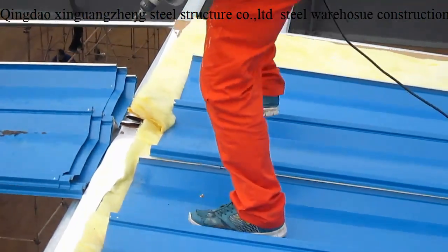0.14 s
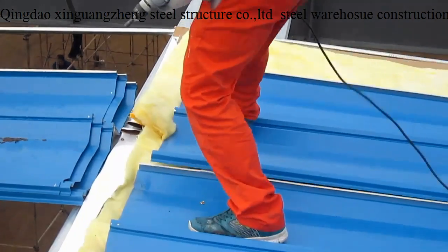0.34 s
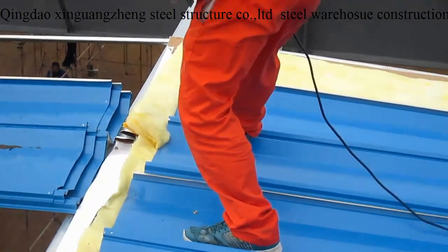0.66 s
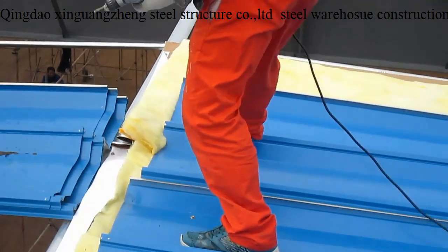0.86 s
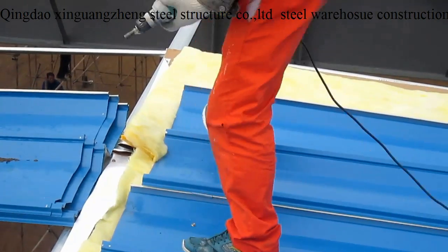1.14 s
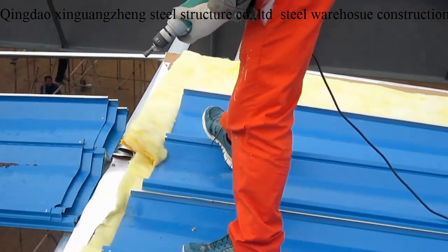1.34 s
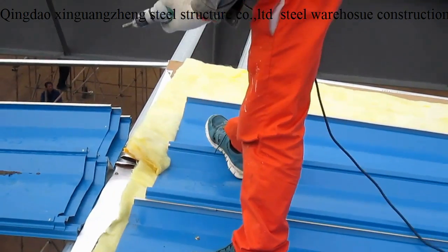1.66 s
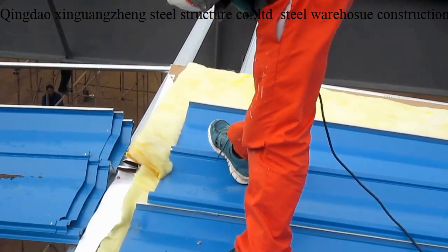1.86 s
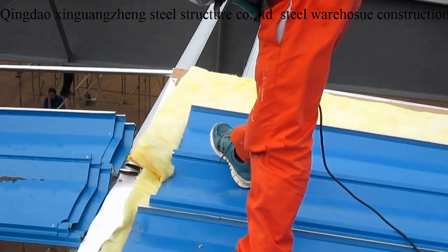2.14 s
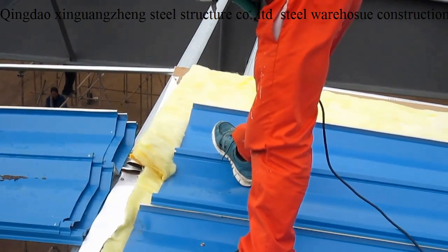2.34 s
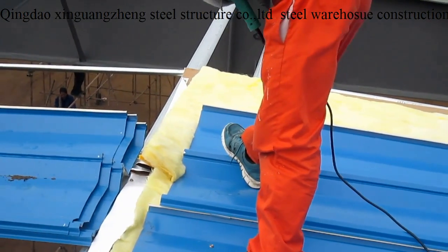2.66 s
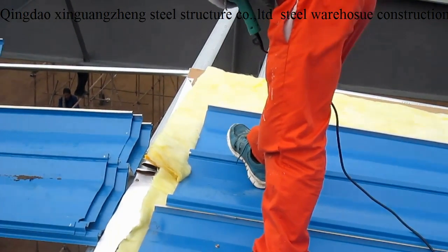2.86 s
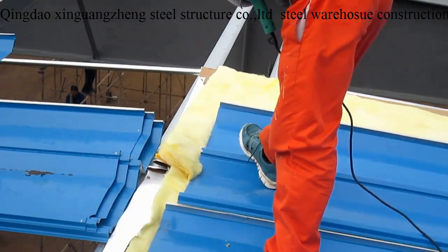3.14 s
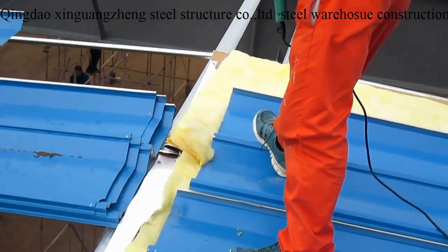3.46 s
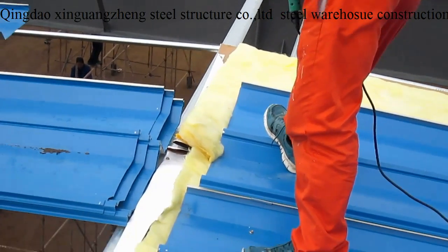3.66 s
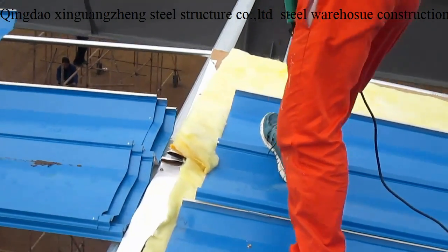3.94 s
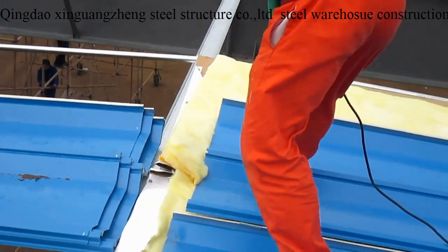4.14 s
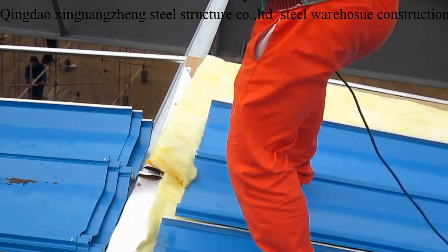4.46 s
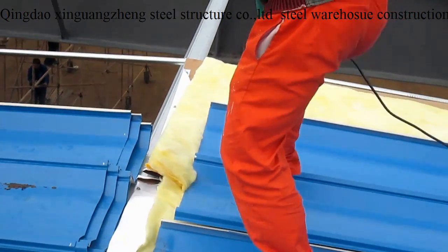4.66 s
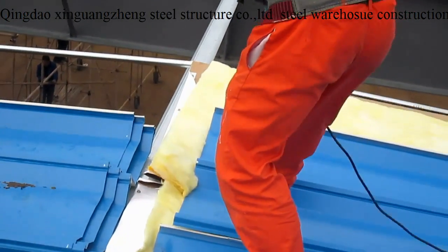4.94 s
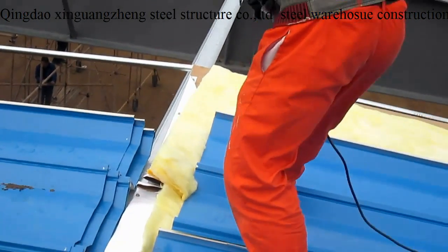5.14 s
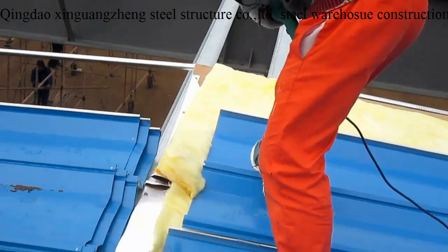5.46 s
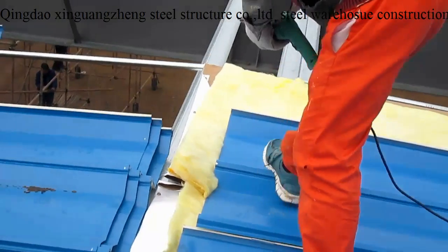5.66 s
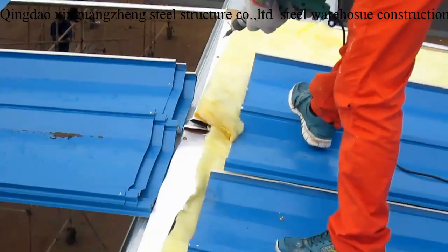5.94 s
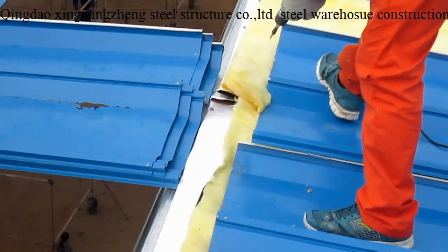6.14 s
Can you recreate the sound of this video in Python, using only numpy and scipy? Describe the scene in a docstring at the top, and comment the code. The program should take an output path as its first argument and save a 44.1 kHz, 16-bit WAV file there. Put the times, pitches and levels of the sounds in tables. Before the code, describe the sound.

Irregular metallic snaps and hollow thuds from thin roof panels underfoot, over low site drone, buffeting wind and late rubbery shoe scuffs.

```python
"""A worker shifts his weight on loose corrugated steel roof sheets, high on a breezy building site.
Throughout, coloured noise makes the site's drone and the wind's rumble; wavelet eddies make dull gust thuds.
From the start his steps make the sheets pop, crunch and rattle: grainy noise and pings ring panel modes.
After 2 s a hammer far below clinks twice on steel: decaying modes with a noisy crack and a long wash.
More crunches follow; near the end his soles scuff, squeak once and shuffle in short bursts of filtered noise."""
import sys
import numpy as np
from scipy import signal
from scipy.fft import rfft, irfft
from scipy.io import wavfile
from scipy.ndimage import uniform_filter1d, minimum_filter1d

SR = 44100
rng = np.random.default_rng(int(sys.argv[2]) if len(sys.argv) > 2 else 0)


def wav_out(sig):
    """Save sig, one row per channel (or a flat mono array), as 16-bit PCM at SR to the path in sys.argv[1]."""
    wavfile.write(sys.argv[1], SR, np.round(np.clip(np.atleast_2d(sig).T, -1, 1) * 32767).astype(np.int16))


N = 278271
TIME = np.arange(N) / SR

# level of the drone and hiss, swelling after the loud crunches and the hammer clinks:
# (time [s], relative level [dB])
BACKGROUND_LEVEL = [(0, -52.5), (.35, -44), (.55, -51), (1.05, -52), (1.3, -50.5), (1.9, -50),
                    (2.15, -41.5), (2.33, -43), (2.6, -55.5), (2.95, -53), (3.15, -43), (3.4, -52.5),
                    (3.7, -55), (4.0, -51.5), (4.5, -50.5), (4.85, -42.5), (5.2, -50), (5.6, -46.5),
                    (5.88, -44.5), (6.12, -45.5), (6.31, -44.5)]
# the sheet gives way under a shoe: (time [s], relative level [dB], relative body level [dB],
# brightness [dB per octave], swell [s], rattle t60 [s])
SHEET_POPS = [(0.015, -44.5, -21, 7.5, 0.0082, 0.064), (0.1097, -35.5, 3.5, 5, 0.0011, 0.24),
              (0.126, -17.5, -10.5, 5, 0.0016, 0.061), (0.14, -27.5, -4, 4.5, 0.0017, 0.21),
              (.287, -34, -1, 4, 0.0011, 0.44), (0.365, -39, -19, 4, 0.022, 0.34),
              (0.461, -46.5, -26, 6.5, .008, 0.14), (.661, -47.5, -17, 3, 0.0029, 0.24),
              (1.137, -34, -5.5, 4.5, 0.0087, 0.15), (1.149, -30, -11, 0, 0.0076, 0.2),
              (1.316, -44, 0.5, 2, 0.0014, 0.13), (1.932, -26.5, -1, -1, 0.0071, 0.13),
              (1.942, -23.5, -9, 3, 0.011, 0.13), (2.8, -46, -6.5, 2.5, 0.011, 0.16),
              (2.954, -25.5, -0.5, 1.5, 0.0047, 0.14), (3.07, -31.5, 6, 3.5, 0.0011, 0.17),
              (3.084, -23.5, -13, 8, 0.001, 0.037), (3.089, -24, -10, 4.5, 0.0021, 0.18),
              (3.17, -44.5, 7.5, 6, 0.0065, 0.28), (3.336, -50, -2, 1, 0.0026, 0.32),
              (4.1, -21.5, -2.5, 4, 0.0033, 0.079), (4.109, -28, -4, 3.5, 0.0019, 0.18),
              (4.365, -52, -7, 0, .002, 0.085), (4.731, -34.5, -5, 4.5, 0.0065, 0.16),
              (4.752, -27, -10, 3, 0.0062, 0.19), (4.801, -32.5, 0, 4, 0.008, 0.17),
              (4.896, -44, -3, 5.5, 0.0046, 0.17), (4.996, -32.5, -8.5, 4, 0.0051, 0.24),
              (5.855, -40, -14.5, 2.5, 0.0031, 0.29), (6.197, -47, 3.5, 3, 0.001, 0.11)]
# colour of the steel sheet: (frequency [Hz], relative density [dB per Hz])
SHEET_COLOUR = [(50, -1.5), (110, 2.5), (300, 8), (400, 3), (520, -3.5), (720, 2.5), (1150, -3.5),
                (1500, -8), (2000, -12.5), (2500, -13), (3900, -18), (5200, -25), (6700, -28), (7800, -33),
                (9700, -37.5), (15000, -61.5)]


def undb(db):
    """Decibels to gain."""
    return 10 ** (np.asarray(db) / 20)


def unit(x):
    """Scale to rms 1."""
    return x / np.sqrt(np.mean(x ** 2))


def curves(table):
    """Each column of a curve table at every sample."""
    s, *columns = np.transpose(table)
    return [np.interp(TIME, s, c) for c in columns]


def add(track, s, x):
    """Mix x into the track from time s on."""
    i = int(round(s * SR))
    x = x[max(-i, 0):max(N - i, 0)]
    track[max(i, 0):max(i, 0) + len(x)] += x


def response(points, hz):
    """Gain of a (Hz, dB) spectrum at the given frequencies."""
    f, db = np.transpose(points)
    return undb(np.interp(np.log(hz + 1), np.log(f), db))


def colour(x, points):
    """Give x a (Hz, dB) spectrum."""
    return irfft(rfft(x) * response(points, np.fft.rfftfreq(len(x), 1 / SR)), len(x))


def noise(points):
    """Coloured noise of rms 1."""
    return unit(colour(rng.standard_normal(N), points))


def fade(t, t60):
    """Decay by 60 dB in t60 seconds."""
    return np.exp(-np.log(1000) * t / t60)


def walk(rate):
    """Smooth chance with a spread of 1, drawn about rate times a second."""
    k = int(SR / rate)
    steps = np.repeat(rng.standard_normal(N // k + 1), k)
    return unit(uniform_filter1d(uniform_filter1d(steps, k), k)[:N])


def convolve(x, ring):
    """Pass x through an impulse response."""
    return signal.fftconvolve(x, ring)[:N]


def bursts(table, grain_db=4):
    """Short grainy rubs, each ringing one broad resonance: (s, dB, centre Hz, width Hz, length s)."""
    size = 8192
    out, hz = np.zeros(N), np.fft.rfftfreq(size, 1 / SR) + 1
    t = (np.arange(size) - size // 2) / SR
    for s, db, centre, width, length in table:
        grit = rng.standard_normal(size) * undb(grain_db * rng.standard_normal(size))
        band = 1 / (1 + ((hz - centre ** 2 / hz) / width) ** 2)
        touch = np.exp(-.5 * (t / length) ** 2)
        rub = unit(irfft(rfft(grit) * band) * touch)
        # the touch's own rms keeps short and long rubs equally strong
        add(out, s + t[0], undb(db) * rub * np.sqrt(np.mean(touch ** 2)))
    return out


def roof_echo(x, t60=0.57, build_s=0.0049):
    """The sound spreads through neighbouring sheets and the hall beneath as a noisy, decaying tail."""
    # colour of the echo: (frequency [Hz], gain [dB])
    hall_colour = [(100, -27), (400, 1), (1200, 2.5), (3500, -10.5), (7000, -2.5), (14000, -18)]
    t = TIME[:SR]
    tail = rng.standard_normal(SR) * fade(t, t60) * (1 - np.exp(-t / build_s))
    return convolve(x, colour(tail / np.linalg.norm(tail), hall_colour))


def site(drone_db=4.5, hiss_db=-63, low_drone_db=-37.5, waver_db=1.34, hiss_waver_db=0.5):
    """Distant work blurred into a drone of wavering bands, over a steady rumble and a hiss that follows it."""
    # blurred work: (frequency [Hz], relative density [dB per Hz])
    drone_colour = [(100, -27), (300, 3.5), (600, 4.5), (900, 5), (1250, 2.5), (1800, -4.5), (2600, -9.5),
                    (4000, -21), (8000, -56), (15000, -79.5)]
    # faint hiss: (frequency [Hz], relative density [dB per Hz])
    hiss_colour = [(1500, -6.5), (2800, 1.5), (4000, 6), (5500, 0.5), (7500, -17), (10000, -29),
                   (15000, -49)]
    # steady rumble: (frequency [Hz], relative density [dB per Hz])
    low_drone_colour = [(15, -3), (30, 3.5), (60, 4), (110, -11), (250, -12), (600, -67), (3000, -140)]
    hiss_pivot_db, hiss_slope = -47, 1  # the hiss gains slope dB per dB of background above the pivot
    background, = curves(BACKGROUND_LEVEL)
    roar, hz = rfft(noise(drone_colour)), np.fft.rfftfreq(N, 1 / SR)
    band = np.digitize(hz, [450, 750, 1100, 1600])  # band edges in Hz
    # each band wavers on its own
    wavering = sum(irfft(roar * (band == k), N) * undb(waver_db * walk(16)) for k in np.unique(band))
    hiss_level = hiss_db + hiss_slope * (background - hiss_pivot_db) + hiss_waver_db * walk(25)
    drone = undb(background + drone_db) * wavering
    hiss = undb(hiss_level) * noise(hiss_colour)
    return drone + hiss + undb(low_drone_db) * noise(low_drone_colour)


def far_knocks(offset_db=-7, scatter_db=3, centre_hz=900, spread=0.53, width_hz=500, length_s=0.0094):
    """Chance knocks and rubs from work all over the site, louder when the background swells."""
    background, = curves(BACKGROUND_LEVEL)
    knocks = []
    for when, (force, pitch) in zip(rng.random(size=40), rng.standard_normal(size=(40, 2)).clip(-1.5, 1.5)):
        db = background[int(when * N)] + offset_db + scatter_db * force
        knocks.append((when * N / SR, db, centre_hz * np.exp(spread * pitch), width_hz, length_s))
    return bursts(knocks)


def scrapes():
    """Faint scraping from work further off: grainy rubs with a broad resonance."""
    # (time [s], level [dB], centre [Hz], width [Hz], length [s])
    far_scrapes = [(1.64, -47, 1410, 500, 0.017), (2.295, -39, 1630, 200, 0.0086),
                   (2.33, -42, 1330, 350, 0.028), (3.875, -46.5, 1460, 300, 0.019),
                   (4.58, -52, 1150, 600, 0.073), (6.055, -47, 1600, 500, 0.011)]
    return bursts(far_scrapes)


def hammer(crack_db=-6.0, crack_t60=0.19, echo_db=-13, echo_t60=1.62, paths_hz=200, attack_s=0.0012,
           wall_s=0.081, wall_db=-11):
    """Steel struck far below: a crack, a blurred ringing clink, a slap off a wall and a long hall wash."""
    # hammer blows: (time [s], relative level [dB])
    blows = [(2.11, -31.5), (2.45, -33.5)]
    # ringing of the struck steel: (frequency [Hz], relative level [dB], t60 [s], blur [0-1])
    steel_modes = [(1410, -8, 0.39, .9), (3133, -9, 0.82, .2), (3203, 2.5, 0.14, 0.76),
                   (3429, -16, 0.4, .5), (4240, -3, 0.05, 0.99), (6570, -28, .35, .5), (7100, -18, .12, 1),
                   (8670, -23, 0.5, 1), (8900, -20, 0.15, 0.68), (9700, -17, .09, .95)]
    crack_colour = [(500, -8), (1400, 4), (6500, 0), (8000, -15.5), (9500, -4.0), (12000, -25), (14500, -50)]
    wash_colour = [(300, -9.5), (1400, 7.5), (3300, 9.5), (6500, -5.0), (10500, -18), (14000, -51.5)]
    out, t = np.zeros(N), TIME[:SR]
    clinks = 0  # one row per blow
    for f, d, t60, blur in steel_modes:
        rate = paths_hz * np.sqrt(f / 1000)
        shimmer = walk(rate)[:2 * SR] + 1j * walk(rate)[:2 * SR]
        shimmer = shimmer.reshape(2, SR) / np.sqrt(2)
        # blur trades the pure tone for one that shimmers in strength and phase
        tone = np.real((1 - blur + blur * shimmer) * np.exp(2j * np.pi * f * t))
        clinks = clinks + undb(d) * fade(t, t60) * tone
    for (s, db), clink in zip(blows, clinks):
        crack = undb(crack_db) * noise(crack_colour)[:SR] * fade(t, crack_t60)
        wash = undb(echo_db) * noise(wash_colour)[:SR] * fade(t, echo_t60)
        onset = undb(db) * (1 - np.exp(-t / attack_s))
        add(out, s, onset * (clink + crack + wash))
        add(out, s + wall_s, undb(wall_db) * onset * crack)
    return out


def buffets():
    """Separate deep pushes of wind, with lulls between them."""
    # (time [s], level [dB], centre [Hz], length [s])
    pushes = [(.775, -18, 80.3, 0.011), (.935, -20, 110, .016), (1.03, -24.5, 80.6, 0.011),
              (1.24, -30.5, 75, 0.024), (1.4, -17.5, 104, 0.014), (1.45, -21, 109, .016),
              (1.52, -20, 100, 0.014), (1.6, -14, 75, 0.015), (1.67, -22.5, 75, 0.024),
              (1.735, -24, 69.5, 0.03), (1.805, -17, 106, 0.015), (2.79, -19.5, 94, 0.01),
              (3.385, -19.5, 90, 0.0096), (3.5, -30.5, 81, 0.014), (3.7, -22, 100, 0.0084),
              (3.76, -31.5, 79, 0.017), (4.03, -29, 64.6, 0.0091), (4.365, -32.5, 65, 0.0073),
              (4.495, -24.5, 58, .018), (4.565, -20, 67.5, 0.0088), (4.9, -26, 70, 0.017),
              (5.175, -26.5, 69, .014), (5.39, -28, 54.6, .018), (5.7, -27, 58.4, 0.01),
              (5.775, -27, 63.7, 0.012), (5.83, -20, 50, 0.011), (5.905, -22, 68, 0.013),
              (6.03, -28, 52, 0.018), (6.24, -28, 65, 0.04)]
    relative_width = 0.84  # bandwidth as a share of the centre frequency
    return bursts([(s, db, hz, relative_width * hz, length) for s, db, hz, length in pushes], grain_db=-1.5)


def eddy(hz, turn, roundness):
    """One push and pull of air pressure; the smaller the eddy, the higher its centre frequency."""
    t = np.arange(-1024, 1024) / SR
    swirl = (1 - 2j * np.pi * hz * t / roundness) ** -roundness
    return np.hanning(len(t)) * np.real(np.exp(2j * np.pi * turn) * swirl)


def gusts(roundness, spread=0.13, scatter_db=3.0, jitter=0.323):
    """Each gust peaks in one sharp eddy; weaker, larger ones run unevenly ahead and behind."""
    # gusts striking the microphone: (peak time [s], length [s], relative peak level [dB],
    # centre of the sharpest eddy [Hz])
    gust_peaks = [(.004, 0.0034, -15, 180), (0.48, 0.0077, -13.5, 308), (0.553, 0.0085, -15.5, 243),
                  (0.709, 0.0034, -9, 292), (0.719, 0.0027, -12, 323), (0.777, 0.0047, -8, 267),
                  (0.883, 0.009, -10, 330), (0.898, 0.003, -9.5, 269), (0.916, 0.0075, -11, 403),
                  (0.923, 0.0054, -6.5, 260), (0.94, 0.0025, -9, 249), (1.033, 0.0061, -19, 227),
                  (1.221, 0.0044, -19, 200), (1.331, 0.0054, -16, 277), (1.356, 0.0028, -9, 209),
                  (1.374, 0.0091, -19, 554), (1.393, 0.011, -9.5, 490), (1.406, 0.0028, -4, 290),
                  (1.438, 0.0043, -8.5, 384), (1.445, .004, -6.5, 330), (1.458, 0.0061, -6.5, 366),
                  (1.4855, 0.0032, -7.5, 470), (1.516, 0.0035, -10, 420), (1.52, 0.0045, -4.5, 290),
                  (1.56, 0.0025, -11, 230), (1.5818, 0.0056, -2.5, 255), (1.596, .004, -11.5, 200),
                  (1.613, 0.0046, -19, 250), (1.788, 0.0051, -4, 350), (1.8, 0.0038, -8.5, 385),
                  (1.812, 0.0012, -13, 222), (1.979, 0.012, -8.5, 376), (1.989, 0.0028, -3.5, 404),
                  (2.4065, 0.0045, 5.5, 375), (2.41, 0.0017, 5, 570), (2.426, 0.0032, -6, 308),
                  (2.781, 0.0045, -16.5, 243), (2.787, 0.003, -18.5, 180), (2.868, 0.0054, -13.5, 320),
                  (2.898, 0.0084, -16, 433), (2.902, 0.0057, -10.5, 290), (2.979, 0.0053, -11.5, 380),
                  (2.995, 0.017, -10, 440), (3.021, 0.009, -7.5, 360), (3.05, 0.0097, -6, 379),
                  (3.061, 0.0058, -9.5, 300), (3.122, 0.023, -7, 322), (3.203, 0.0043, -20, 300),
                  (3.227, 0.0096, -9.5, 358), (3.26, 0.014, -13, 323), (3.364, 0.0021, -7.5, 323),
                  (3.383, 0.0019, -8, 410), (3.491, 0.0052, -7.5, 272), (3.556, 0.0024, -5.5, 374),
                  (3.6854, 0.0075, -3.5, 288), (3.751, 0.004, -10, 280), (4.241, 0.014, -18.5, 410),
                  (4.502, 0.0049, -14.5, 179), (4.568, 0.0029, -23, 190), (5.467, 0.0035, -17.5, 195),
                  (5.697, 0.0024, -10, 255), (5.78, 0.0017, -11, 233), (5.83, .004, -23, 180),
                  (5.9, 0.013, -14, 182), (5.943, 0.0096, -15, 236), (6.243, 0.012, -14, 220),
                  (6.302, 0.0034, -10, 200)]
    eddy_gap_s, flank_drop_oct = 0.00712, 0.54  # spacing of eddies; largest drop in pitch on the flanks
    rise, fall = 0.74, 1.9  # build-up and dying away, in lengths of the gust
    out, half = np.zeros(N), 1024 / SR
    place = np.arange(-5, 6)  # eddy 0 is the peak
    for s, length, db, hz in gust_peaks:
        late, pitch, force = rng.standard_normal(size=(3, len(place))).clip(-2, 2) * (place != 0)
        age = (place + jitter * late) * eddy_gap_s
        strength = np.exp(-np.abs(age) / (length * np.where(age < 0, rise, fall)))
        centre = hz * np.exp(spread * pitch) * 2 ** (-flank_drop_oct * (1 - strength))
        gain = strength * undb(db + scatter_db * force)
        for a, g, f, turn in zip(age, gain, centre, rng.random(len(place))):
            add(out, s + a - half, g * eddy(f, turn, roundness))
    return out


def wind(rumble_db=-3, flutter_db=-34.5, gust_db=-1, eddy_hz=175, spread=0.26, scatter_db=3.5,
         roundness=2.48, port_hz=85, lull_db=0.3):
    """A rumble, a stream of small eddies and hard gusts, all right at the microphone."""
    # strength of the breeze: (time [s], relative level [dB])
    breeze_curve = [(0, -6.5), (.07, -77), (.14, -40), (.55, -27), (.78, -30), (.83, -36.5), (.92, -23.5),
                    (1.1, -37.5), (1.22, -28), (1.35, -28), (1.44, -12.5), (1.62, -21), (1.74, -26.5),
                    (1.81, -27), (1.87, -26.5), (2.08, -32.5), (2.33, -25), (2.42, -30), (2.66, -46.5),
                    (2.79, -28.5), (2.93, -21.5), (3.05, -18.5), (3.25, -23), (3.45, -32), (3.6, -39),
                    (4.42, -33.5), (4.52, -35.5), (4.68, -26.5), (4.8, -23.5), (5.13, -41), (5.55, -33.5),
                    (5.8, -27), (6.15, -28.5), (6.31, -9.5)]
    # low rumble: (frequency [Hz], relative density [dB per Hz])
    rumble_colour = [(20, -10.5), (45, 3.5), (88, 1), (125, -2), (180, -12), (300, -22), (700, -80),
                     (4000, -110)]
    pivot_db, slope = -31.5, 0.68  # small eddies gain slope dB per dB of breeze above the pivot
    breeze = curves(breeze_curve)[0] + lull_db * walk(22)
    stream, half = np.zeros(N), 1024 / SR
    chance = zip(rng.random(size=(1200, 2)), rng.standard_normal(size=(1200, 2)).clip(-2, 2))
    for (when, turn), (pitch, force) in chance:
        swirl = eddy(eddy_hz * np.exp(spread * pitch), turn, roundness)
        add(stream, when * N / SR - half, undb(scatter_db * force) * swirl)
    flutter = undb(flutter_db + slope * (breeze - pivot_db)) * unit(stream)
    # the port leaks slow pressure, so every push swings back
    leak = signal.butter(2, port_hz, "high", fs=SR, output="sos")
    pushes = signal.sosfilt(leak, flutter + undb(gust_db) * gusts(roundness))
    return undb(breeze + rumble_db) * noise(rumble_colour) + pushes


def shuffles():
    """A shoe slides and the sheet murmurs under it: grainy, low-pitched rubs."""
    # (time [s], level [dB], centre [Hz], width [Hz], length [s])
    slides = [(5.525, -38, 325, 300, 0.022), (5.525, -42, 880, 600, 0.023), (6.2, -31, 600, 130, .006),
              (6.207, -42, 1260, 120, 0.008), (6.255, -34, 444, 497, 0.02), (6.3, -35, 497, 600, 0.0039)]
    return bursts(slides)


def soles():
    """Rubber on paint: broad scuffs and a squeak."""
    # the sole scuffs the paint: (time [s], relative level [dB], length [s])
    scuffs = [(0.612, -56.5, 0.015), (1.628, -63, 0.0066), (1.713, -60, 0.013), (4.631, -53.5, 0.017),
              (4.973, -50.5, .013), (5.055, -60, 0.021), (5.109, -53.5, 0.0029), (5.218, -63, 0.0051),
              (5.274, -58, 0.013), (5.492, -55, 0.0049), (5.529, -59.5, 0.0096), (5.67, -50.5, 0.028),
              (5.672, -43, 0.0018), (5.686, -39, 0.0022), (5.746, -54, .009), (5.948, -55.5, 0.0063),
              (6.048, -71, 0.021), (6.122, -56.5, 0.01)]
    # it squeaks once: (time [s], relative level [dB], centre [Hz], width [Hz], length [s])
    squeak = [(5.634, -50.5, 4220, 250, 0.0056)]
    # a soft sole dulls the very top: (frequency [Hz], gain [dB])
    rubber = [(3000, 7), (6000, 0.5), (9000, -4), (14000, -14.5)]
    centre_hz, width_hz = 4650, 11000
    rubs = [(s, db, centre_hz, width_hz, length) for s, db, length in scuffs]
    return colour(bursts(rubs + list(squeak)), rubber)


def heaves(attack_s=0.0016, t60=0.26):
    """Deep, short shudders of the roof as his weight lands: low noise under quick decays."""
    # landings: (time [s], relative level [dB])
    landings = [(.115, -20), (0.285, -21), (1.93, -14.5), (4.098, -12.5), (4.731, -19)]
    # colour of the shudder: (frequency [Hz], relative density [dB per Hz])
    shudder_colour = [(20, -20), (55, 7), (110, 3), (200, -15), (400, -27), (1500, -68)]
    out, t = np.zeros(N), TIME[:SR]
    for s, db in landings:
        add(out, s, undb(db) * (1 - np.exp(-t / attack_s)) * fade(t, t60))
    return out * noise(shudder_colour)


def thuds():
    """The whole span flips, drums and clanks: quickly damped swings of a panel held down by a shoe."""
    # (time [s], level before loading and decay [dB], pitch [Hz], t60 [s])
    swings = [(.126, -28, 424, 0.071), (.126, -22.5, 1685, 0.056), (.127, -14, 700, 0.051),
              (0.144, -18, 247, 0.079), (0.287, -16.5, 246, 0.12), (1.145, -23.5, 710, 0.11),
              (1.149, -25, 1082, .09), (1.934, -19.5, 1247, 0.15), (1.935, -16.5, 1083, 0.094),
              (1.938, 0.5, 290, 0.034), (2.113, -26.5, 226, 0.22), (1.9498, 5, 193, 0.032),
              (2.953, -14.5, 347, 0.15), (3.0808, 0.5, 316, 0.011), (3.114, -11, 249, 0.071),
              (4.098, -9.5, 294, 0.099), (4.115, -16, 303, 0.11), (4.731, -11, 210, 0.082),
              (4.753, -17, 811, 0.12), (4.754, -20, 974, 0.11), (4.801, -33, 770, 0.068),
              (4.893, -11, 290, 0.028)]
    out, t = np.zeros(N), TIME[:SR // 4]
    for s, db, hz, t60 in swings:
        push = 1 - np.exp(-(np.pi * hz * t) ** 2)  # the soft sole takes half a cycle to load it
        add(out, s, undb(db) * push * fade(t, t60) * np.sin(2 * np.pi * hz * t))
    return out


def seam_clicks():
    """Hard overlapping edges click together; the longer the contact, the purer the ring."""
    # (time [s], level [dB], centre [Hz], length [s])
    clicks = [(.1262, -16, 2470, 0.001), (.141, -24.5, 3500, .002), (.166, -34.5, 3700, 0.0025),
              (.305, -40, 3540, .003), (.377, -41.5, 3700, 0.0028), (0.128, -15.5, 3700, 0.0011),
              (0.129, -25, 4900, 0.003), (0.129, -29, 6360, 0.0018), (1.152, -47, 11300, 0.0016),
              (1.932, -25, 2330, 0.0031), (1.934, -25, 3780, 0.0033), (1.9372, -30, 12200, 0.00036),
              (3.084, -33, 11800, 0.00065), (3.0845, -9.5, 4090, 0.0007), (3.085, -17.5, 3280, 0.0018),
              (3.087, -19.5, 2230, 0.0025), (3.086, -23, 4670, .002), (3.087, -24.5, 2900, .0022),
              (4.1005, -18.5, 3770, 0.0009), (4.112, -27, 3600, .003), (4.755, -27.5, 3600, 0.0047),
              (4.756, -35, 6030, 0.0037), (4.806, -38, 3700, 0.0078)]
    width_cycles = 0.69  # width of the ring times the length of the contact
    return bursts([(s, db, hz, width_cycles / length, length) for s, db, hz, length in clicks])


def crinkles(per_rattle=60, level_db=-4, per_s=420, centre_hz=3500, spread=.34, scatter_db=4,
             ring_t60=0.017, bright_hz=2200):
    """As the sheet gives way, one tiny buckle after another pings at a pitch of its own."""
    out, t = np.zeros(N), TIME[:SR // 25]
    for s, db, _, bright_db, _, t60 in SHEET_POPS:
        gap = max(1 / per_s, t60 / per_rattle)  # a long rattle has sparser, stronger pings
        for k, (late, pitch, force) in enumerate(rng.standard_normal(size=(36, 3)).clip(-2, 2)):
            age, hz = (k + .5 + late / 2) * gap, centre_hz * np.exp(spread * pitch)
            tilt_db = bright_db * np.log2(hz / bright_hz)
            steel = response(SHEET_COLOUR, hz) / response(SHEET_COLOUR, bright_hz)
            gain = undb(db + level_db + scatter_db * force + tilt_db) * steel
            ping = fade(t, ring_t60) * np.sin(2 * np.pi * hz * t)
            add(out, s + age, gain * np.sqrt(gap * per_s) * fade(age, t60) * ping)
    return out


def panel_ring(hz, detune=0.021, reach_db=2.0, patch_db=-2.0, patch_hz=2700, patch_spread=.5, patch_t60=0.028):
    """Panel modes retuned by load and driven unevenly, plus tinny pings of the patch that gives way."""
    # ringing of the ribbed panel: (frequency [Hz], relative level [dB], t60 [s])
    sheet_modes = [(211, -3, 0.043), (290, -2.5, 0.037), (630, -7, 0.021), (811, -6, 0.033),
                   (1050, -7, 0.011), (1236, -16, 0.05), (2300, -12, 0.066), (2970, -5, 0.08),
                   (3500, 2.5, 0.065), (3700, -2, 0.081), (4630, -9, 0.027), (5040, 0.5, 0.04)]
    chance = rng.standard_normal(size=(len(sheet_modes), 2)).clip(-1.5, 1.5)
    modes = [(f * np.exp(detune * load), db + reach_db * reach, t60)
             for (f, db, t60), (load, reach) in zip(sheet_modes, chance)]
    pings = [(patch_hz * np.exp(patch_spread * pitch), patch_db + reach_db * reach, patch_t60)
             for pitch, reach in rng.standard_normal(size=(5, 2)).clip(-1.5, 1.5)]
    out = 0
    for f, db, t60 in modes + pings:
        damping = np.log(1000) / (2 * np.pi * t60)
        pole = damping + 1j * hz
        out = out + undb(db) * 2 * damping * pole / (pole * pole + f * f)
    return out


def sheet_pops(grain_db=5.5, chatter_db=0.5, body_hz=800, bright_hz=2200, body_lag=1.7, ring_db=-4, trim_db=-1):
    """Strain builds, the sheet snaps through, and a dying rattle of tiny slips rings the panel."""
    size = 32768
    t, hz = np.arange(size) / SR - .05, np.fft.rfftfreq(size, 1 / SR) + 1  # the snap is at t = 0
    steel = response(SHEET_COLOUR, hz)
    steel = steel / np.sqrt(np.mean(steel ** 2 * (hz > 2 * body_hz)))
    body = 1 / (1 + (hz / body_hz) ** 4)
    out = np.zeros(N)
    for s, db, body_db, bright_db, swell, t60 in SHEET_POPS:
        chatter = unit(uniform_filter1d(rng.standard_normal(size), size=160))
        grain = undb(grain_db * rng.standard_normal(size) + chatter_db * chatter)
        slips = unit(rng.standard_normal(size) * grain)
        strain = np.exp(np.minimum(t, 0) / swell)
        # long bending waves travel slowly and outlast the sharp edge
        age = np.maximum(t, 0)
        edge = rfft(slips * strain * fade(age, t60))
        boom = rfft(slips * strain * fade(age, t60 * body_lag))
        tilt = undb(bright_db * np.log2(np.maximum(hz, body_hz) / bright_hz))
        panel = steel * (undb(ring_db) + panel_ring(hz))
        snap = irfft(panel * (edge * (1 - body) * tilt + boom * body * undb(body_db)))
        add(out, s + t[0], undb(db + trim_db) * snap)
    return out


def scene(echo_db=-11, side_db=-20, site_side_db=-36):
    """Nearly mono: the sheet lies a little to the right, and only short reflections have some width."""
    # colour of the short reflections: (frequency [Hz], gain [dB])
    width_colour = [(100, -0.5), (300, -19.5), (1000, -4), (3000, 3.5), (12000, 7.5)]
    # how much the sheet leans to the right port: (frequency [Hz], gain [dB])
    right_lean = [(200, -47.5), (900, -31), (3000, -22), (12000, -27)]
    far = site() + far_knocks() + scrapes() + hammer()
    air = buffets() + wind()
    steel = shuffles() + soles() + seam_clicks() + crinkles() + sheet_pops()
    mid = far + air + steel + thuds() + heaves() + undb(echo_db) * roof_echo(steel)
    sent = undb(side_db) * steel + undb(site_side_db) * far
    reflections = colour(roof_echo(sent, t60=.07, build_s=.002), width_colour)
    ports = np.array([[1], [-1]])  # left, right
    return mid + ports * (reflections - colour(steel, right_lean))


def record(dry, low_hz=18, top_hz=15200):
    """Drop the deepest bass, turn peaks down towards full scale and cut the top."""
    x = signal.sosfilt(signal.butter(2, low_hz, "high", fs=SR, output="sos"), dry)
    room = minimum_filter1d(1 / np.maximum(np.abs(x).max(axis=0), 1), size=400)
    gain = uniform_filter1d(uniform_filter1d(room, size=200), size=200)  # smooth gain, shared by both channels
    return signal.sosfilt(signal.ellip(8, .2, 80, top_hz, fs=SR, output="sos"), x * gain)


dry = scene()
out = record(dry)
wav_out(out)
```